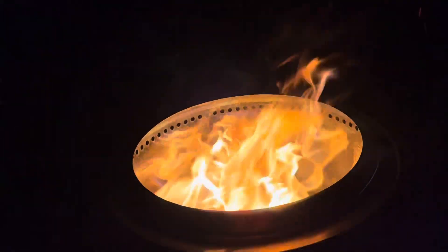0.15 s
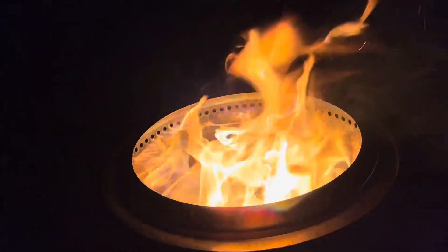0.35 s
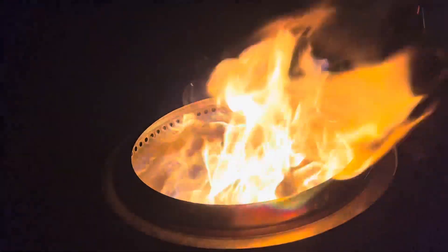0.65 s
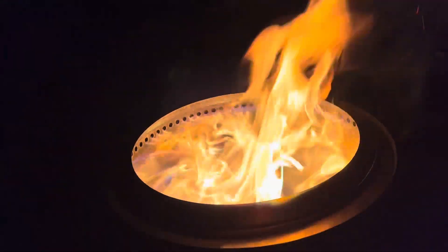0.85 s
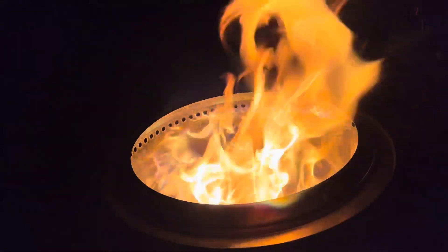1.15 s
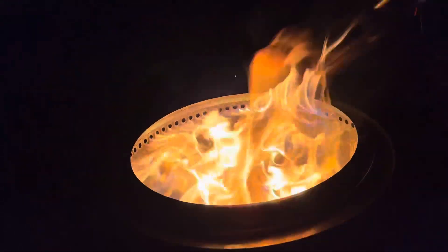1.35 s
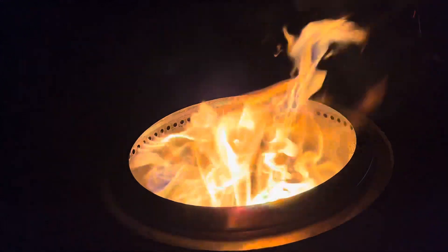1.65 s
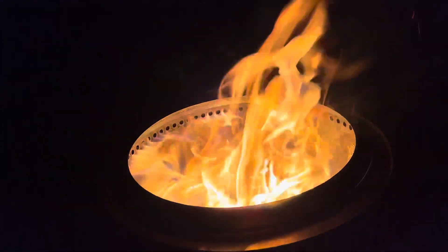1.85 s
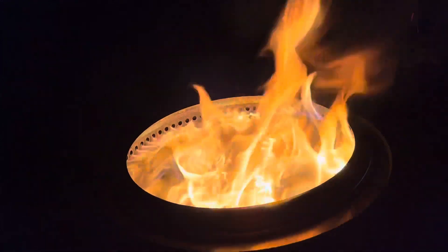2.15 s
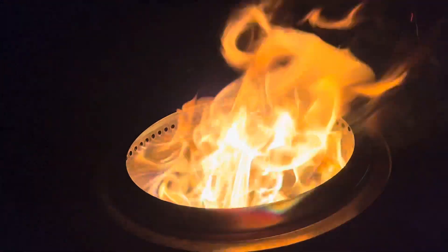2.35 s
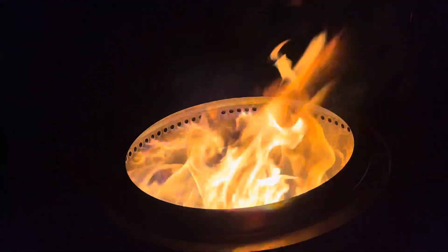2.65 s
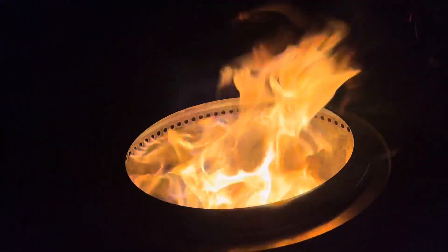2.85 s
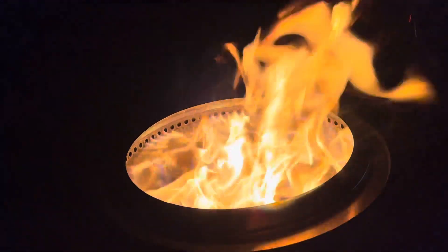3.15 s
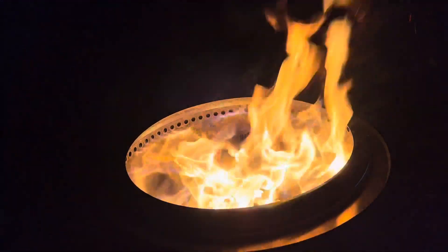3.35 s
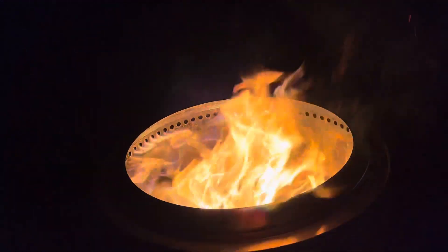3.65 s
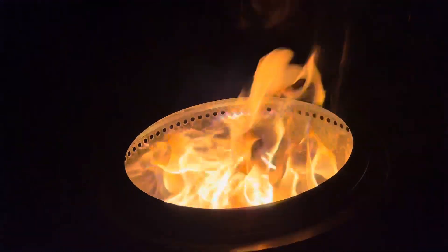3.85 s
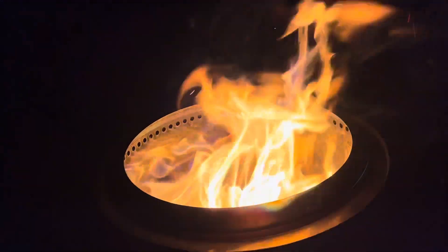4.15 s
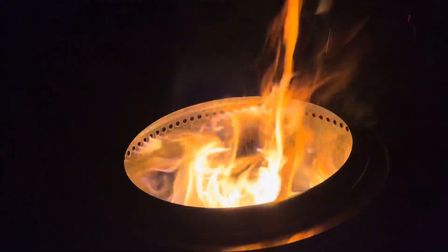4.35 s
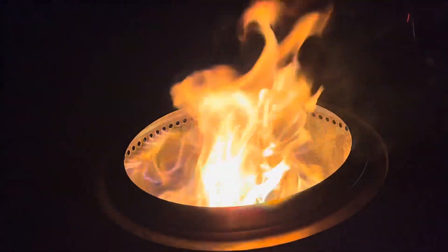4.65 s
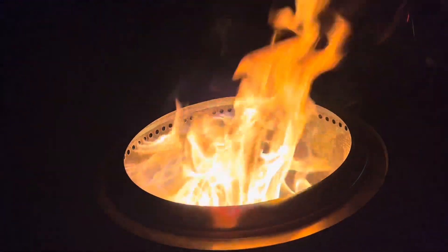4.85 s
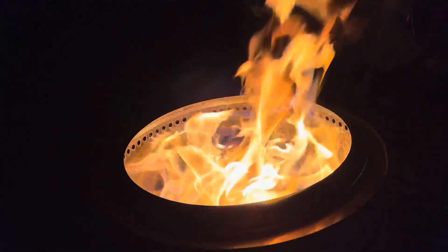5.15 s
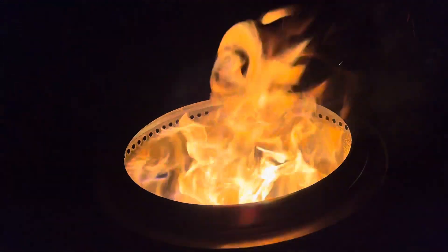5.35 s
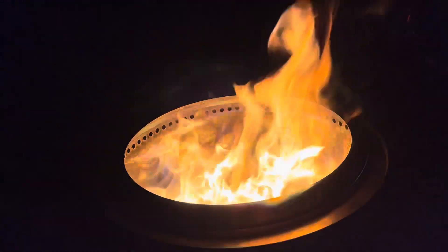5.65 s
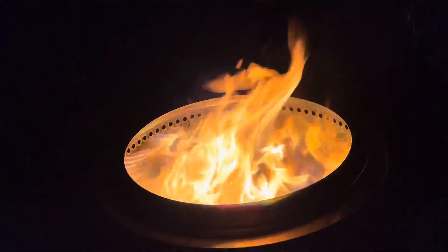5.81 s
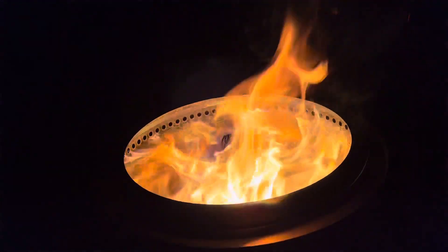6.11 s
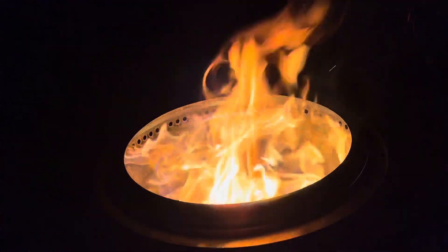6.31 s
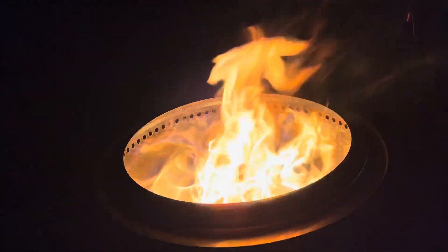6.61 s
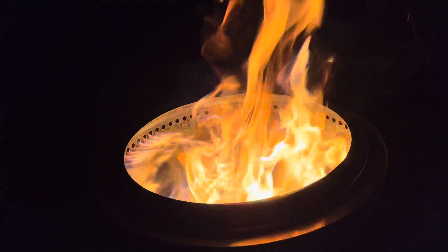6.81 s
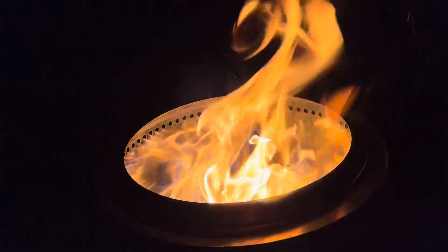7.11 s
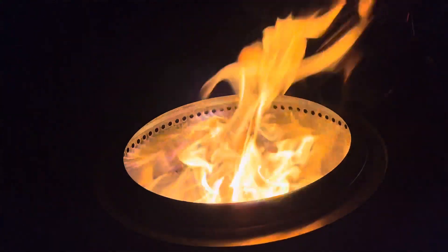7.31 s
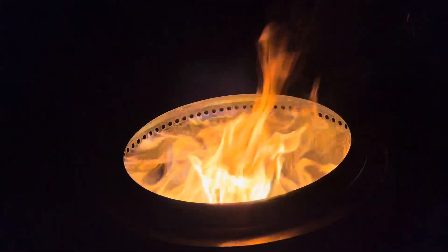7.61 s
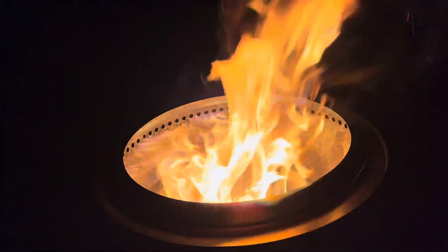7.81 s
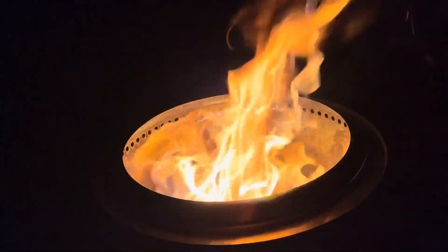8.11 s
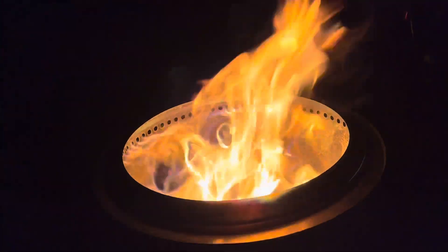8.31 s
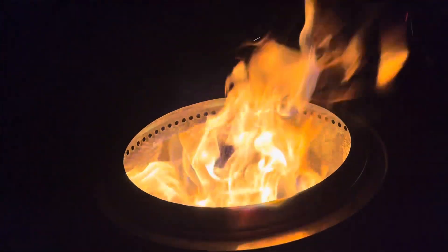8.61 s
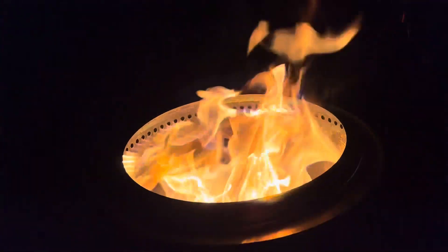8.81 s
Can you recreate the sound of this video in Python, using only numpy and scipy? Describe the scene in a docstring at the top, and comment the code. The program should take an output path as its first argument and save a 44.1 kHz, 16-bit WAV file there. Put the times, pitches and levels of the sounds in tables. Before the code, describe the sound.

A wood fire burns in a metal pit outdoors at night, heard close in stereo for about nine seconds. Its deep, soft roar flutters constantly, dipping briefly near 2.7 s and flaring around 5.8 s. A continuous cricket trill, rapid and purring, sits slightly right with a slightly lower, faster neighbour, inside a dense, shimmering chorus that swells gently about once a second. A higher cricket joins briefly near 0.8, 3.5, 5.9 and 8.5 s. Dull far bangs come from the left at 0.55, 0.9 and 1.35 s, the last trailing scattered echoes until 1.9 s; much fainter ones follow near 4.2, 5.8 and 8.3 s. Sharp dry snaps stand out at 0.55, 2.5, 4.8 and 5.8 s, thickening from 5.6 to 7.5 s among faint ticks. Soft gas thumps come at 0.6, 5.8 and 8 s. Thin steam sizzle strengthens after 7 s, strongest near 8.6 s.

```python
"""A wood fire flutters and rumbles on a summer night while its logs tick, snap and sizzle: shaped noise
under a moving level, with short clicks on top. A tree cricket trills close by, beside a slightly faster
neighbour, as pulsed tones; a dense chorus of other insects is made of more trills and shimmering noise bands.
A few dull bangs, like far-off fireworks, arrive from the left as filtered clicks with scattered returns."""
import sys
import numpy as np
from scipy import signal
from scipy.fft import rfft, irfft, next_fast_len
from scipy.io import wavfile

SR = 44100
rng = np.random.default_rng(int(sys.argv[2]) if len(sys.argv) > 2 else 0)


def wav_out(sig):
    """Save sig, one row per channel (or a flat mono array), as 16-bit PCM at SR to the path in sys.argv[1]."""
    wavfile.write(sys.argv[1], SR, np.round(np.clip(np.atleast_2d(sig).T, -1, 1) * 32767).astype(np.int16))


N = 395577
TIME, BINS = np.arange(N) / SR, np.fft.rfftfreq(N, 1 / SR)  # seconds, Hz


def amp(db):
    """Decibels to gain."""
    return 10 ** (np.asarray(db) / 20)


def unit(x):
    """Scales to rms 1."""
    return x / np.sqrt(np.mean(abs(x) ** 2) + 1e-20)


def colour(points):
    """Gain at every frequency from (Hz, dB) points, joined on a logarithmic frequency axis."""
    hz, db = np.transpose(points)
    return amp(np.interp(np.log(BINS + 1), np.log(hz), db))


def shaped(x, gain):
    """Filters by a gain given at every frequency."""
    size = next_fast_len(N, True)
    hz = np.fft.rfftfreq(size, 1 / SR)
    spectrum = rfft(x, size) * np.interp(hz, BINS, gain)
    return irfft(spectrum, size)[..., :N]


def wander(rate):
    """Smooth random curve of rms 1 that takes a new direction rate times a second."""
    knots = rng.standard_normal(4000)
    return unit(np.interp(TIME * rate, np.arange(len(knots)), knots))


def sides(balance_db):
    """Left and right gains that differ by balance_db; positive leans left."""
    return amp([[balance_db / 2], [-balance_db / 2]])


def ports(x, balance_db, turn=0):
    """Places an analytic sound on two microphones, the right one turned in phase (radians)."""
    left = x * amp(balance_db / 2)
    right = x * np.exp(1j * turn) * amp(-balance_db / 2)
    return np.array([left, right]).real


def add(mix, s, sound):
    """Adds a sound at time s in seconds."""
    part = mix[..., max(round(s * SR), 0):][..., :sound.shape[-1]]
    part += sound[..., :part.shape[-1]]


def scatter(x, t60):
    """Diffuse echoes from ground, trees and fences, different on each side, fading 60 dB in t60 seconds."""
    t = TIME[:SR // 2]
    tail = rng.standard_normal((2, len(t))) * amp(-60 * t / t60)
    tail /= np.linalg.norm(tail, axis=1, keepdims=True)
    return signal.oaconvolve(np.atleast_2d(x), tail, axes=1)[:, :N]


def causal(points):
    """The ring of one click through a spectrum: quick rise, then decay, with peak 1 (minimum phase)."""
    hz = np.fft.rfftfreq(4096, 1 / SR)
    log_gain = np.log(np.interp(hz, BINS, colour(points)))
    log_gain = np.concatenate([log_gain, log_gain[-2:0:-1]])
    ring = np.fft.ifft(np.exp(signal.hilbert(log_gain).conj())).real[:2048]
    return ring / abs(ring).max()


def cloud(t60):
    """A dying cloud of tiny clicks with energy 1, fading 60 dB in t60 seconds."""
    t = TIME[:SR // 4]
    clicks = rng.standard_normal(len(t)) * amp(-60 * t / t60)
    return clicks / np.linalg.norm(clicks)


def shimmer_band(hz, spread_hz, shimmer_db=1.22, shared=0.19):
    """Noise in a bell-shaped band with a quick random shimmer, rms 1, partly alike on both sides."""
    noise = rng.standard_normal((2, N))
    bell = np.exp(-((BINS - hz) / spread_hz / 2) ** 2)
    band = shaped(noise + shared * noise[::-1] / 2, bell)
    return unit(band * amp(shimmer_db * wander(70)))


def trill(hz, fall_hz, rate, width, first=0, slip=.00005, uneven_db=2.5):
    """Each wing stroke draws the scraper over the file: a soft tone pulse whose pitch sags."""
    chance = rng.standard_normal((700, 3))  # one row a stroke: timing, pitch, loudness
    centres = first + (np.arange(len(chance)) - 1) / rate + slip * np.cumsum(chance[:, 0])
    stroke = np.searchsorted((centres[1:] + centres[:-1]) / 2, TIME)  # the nearest stroke at each moment
    t = TIME - centres[stroke]
    swell = np.exp(-.5 * (t * rate / width) ** 2) * np.cos(np.pi * t * rate).clip(0) ** .5
    turns = (hz + 10 * chance[stroke, 1]) * t - fall_hz * rate * t ** 2 / 2
    loudness = amp(uneven_db * chance[stroke, 2])
    return unit(swell * loudness * np.exp(2j * np.pi * turns))


def air():
    """The faint hiss of the night and the microphones: coloured noise, wavering a little."""
    # Spectrum of the hiss. Each row: frequency in Hz, level in dB per Hz before the waver.
    hiss_spectrum = [(300, -108), (780, -117), (1020, -112), (1260, -117), (1620, -104), (3500, -103),
                     (4560, -110), (6000, -107), (7600, -114), (9300, -134), (15200, -134)]
    hiss = shaped(rng.standard_normal((2, N)), colour(hiss_spectrum)) * np.sqrt(SR / 2)
    return hiss * amp(.5 * wander(12))


def chorus(swell_db=1.0, uneven_db=0.8):
    """Countless far trills merge into bands: one sings in regular waves, the others swell at random."""
    # Far swarms, too many to tell apart.
    # Each row: centre in Hz, spread in Hz, mean level in dB, left-right balance in dB.
    swarms = [(1895, 38, -72, 2), (2302, 89, -57, -8.5), (2799, 117, -59.5, -1), (3420, 170, -63.5, -1.5),
              (4970, 100, -80.5, 4), (5266, 216, -71, 14), (6586, 314, -70.5, 3.5)]
    wave_db, wave_depth_db = -55.5, 1.34  # mean level, swing either way
    crest_s, period_s = .25, .873
    waves_db = wave_depth_db * np.cos(2 * np.pi * (TIME - crest_s) / period_s)
    waves_db += uneven_db * wander(4)
    out = shimmer_band(4026, 122.4) * amp(wave_db + waves_db) * sides(1.4)
    for hz, spread_hz, db, balance_db in swarms:
        level = amp(db + swell_db * wander(7.9))
        out += shimmer_band(hz, spread_hz) * level * sides(balance_db)
    return out


def crickets(burst_hz=4400, fade_s=.065):
    """Farther wing-stroke trills, steady or chirping, blurred by echoes; one more joins in short bursts."""
    # Single crickets. Each row: pitch in Hz, fall over one stroke period in Hz, strokes per second,
    # chirps per second, sounding share of a chirp cycle, level in dB, left-right balance in dB.
    singers = [(2824, 160, 41, .2, 0.96, -71.5, 4), (4200, 24, 95, 4.2, 0.22, -70, -2),
               (4820, 70, 47, 1.9, 0.76, -76.5, 0), (5240, 100, 52, 4.9, 0.84, -69.5, 4),
               (5530, 48, 96, 4.1, 0.37, -77, 0)]
    # Bursts of one cricket pitched above the near pair. Each row: start in seconds, end in seconds, level in dB.
    bursts = [(.83, 1.21, -64), (3.5, 3.88, -57), (5.9, 6.28, -57.5), (8.46, 8.7, -64)]
    out = np.zeros((2, N))
    for hz, fall_hz, rate, chirps, share, db, balance_db in singers:
        cycle = (chirps * TIME + rng.random() + 0.28 * wander(1.945)) % 1
        gate = np.sin(np.pi * np.minimum(cycle / share, 1)).clip(0) ** .5
        song = trill(hz, fall_hz, rate, width=0.51, slip=.0003).real * gate
        out += amp(db) * unit(scatter(song, t60=0.16)) * sides(balance_db)
    gate = np.zeros(N)
    for start, end, db in bursts:
        gate += amp(db) * np.clip(np.minimum(TIME - start, end - TIME) / fade_s, 0, 1)
    strokes = trill(burst_hz, 130, 38.6, first=.019, width=.2, slip=.00015, uneven_db=.7)
    song = ports(gate * strokes, balance_db=4, turn=1.1)
    return out + song + amp(-8) * scatter(song, t60=.12)


def bangs(scatter_gain_db=-2, bounce_s=0.00335, bounce_db=-11, echo_db=-20):
    """Far reports, dulled by the air: filtered clicks, with returns from the land smeared into clouds."""
    # Bangs and their returns from the land around. Each row: time in seconds,
    # report level in dB, scattered sound relative to the report in dB before scatter_gain_db.
    reports = [(0.557, -30, 0), (0.903, -37, -7), (1.337, -29.5, -5), (1.394, -50, 12.5), (1.442, -48, 6.5),
               (1.513, -56, 9), (1.575, -62, 16), (1.693, -53, 6), (1.748, -55, 15), (1.791, -59, 17.5),
               (1.82, -62.5, 17), (1.862, -59, 7), (2.249, -60, -4), (4.156, -48, -2), (5.822, -49, 9),
               (8.334, -50.5, -7)]
    # Spectrum of a report. Each row: frequency in Hz, relative level in dB.
    report_spectrum = [(100, -55), (300, -10.5), (420, -8.5), (560, 0.5), (760, -3.5), (930, -13),
                       (1040, -7.5), (1170, -16.5), (1290, -33), (1450, -23.5), (1680, -14), (1900, -32),
                       (2300, -18), (5000, -100)]
    # Spectrum of the scattered sound. Each row: frequency in Hz, relative level in dB.
    scatter_spectrum = [(100, -42.5), (300, -11), (420, -12.5), (560, -1), (780, -7.5), (930, -2.5),
                        (1040, -4), (1170, -9), (1290, -16.5), (1450, -7), (1680, -0.5), (1900, -9.5),
                        (2300, -11), (5000, -84.5)]
    direct, scattered = np.zeros((2, N))
    report = causal(report_spectrum)
    for s, db, scatter_db in reports:
        add(direct, s + 0.00092, amp(db) * report)
        add(direct, s + 0.0011 + bounce_s, amp(db + bounce_db) * report)  # one quick reflection close by
        add(scattered, s + 0.00088, amp(db + scatter_db + scatter_gain_db) * cloud(t60=0.093))
    sound = direct + signal.oaconvolve(scattered, causal(scatter_spectrum))[:N]
    placed = ports(signal.hilbert(sound), balance_db=8, turn=2)
    return placed + amp(echo_db) * scatter(placed, t60=0.19)


def tree_crickets(width=0.22, effort_db=.5):
    """The nearest wings trill a little to the right; a lower, faster neighbour drifts in and out of step."""
    near_db, near_hz, near_fall_hz, near_rate = -50.0, 2372, 250, 34.48  # rate in wing strokes a second
    neighbour_db, neighbour_hz, neighbour_fall_hz, neighbour_rate = -53.5, 2315, 170, 36.01
    strokes = trill(near_hz, near_fall_hz, near_rate, width, first=.0055, slip=.00004, uneven_db=1.2)
    song = ports(strokes, balance_db=-4, turn=-.7)
    song += amp(-14) * unit(scatter(song, t60=0.53))
    strokes = trill(neighbour_hz, neighbour_fall_hz, neighbour_rate, width, first=.0035, slip=.00004)
    neighbour = ports(strokes, balance_db=-3, turn=-.5)
    neighbour += amp(-8) * scatter(neighbour, t60=0.18)
    return amp(near_db + effort_db * wander(3.6)) * song + amp(neighbour_db) * neighbour


def from_fire(x, balance_db=0, lag_s=.000326):
    """Places a sound of the fire on two microphones: the left one hears it a little later."""
    hz = np.fft.rfftfreq(len(x), 1 / SR)
    late = irfft(rfft(x) * np.exp(-2j * np.pi * hz * lag_s), len(x))
    return np.array([late * amp(balance_db / 2), x * amp(-balance_db / 2)])


def embers(waver_db=0.6, waver_per_s=14):
    """The glowing wood gives a thin, wavering hiss of coloured noise."""
    # Spectrum of the hiss. Each row: frequency in Hz, level in dB per Hz before the waver.
    ember_spectrum = [(5000, -135), (8300, -122), (9300, -134), (10700, -129), (12200, -117), (13800, -123),
                      (15200, -116)]
    hiss = shaped(rng.standard_normal(N), colour(ember_spectrum)) * np.sqrt(SR / 2)
    return from_fire(hiss * amp(waver_db * wander(waver_per_s)))


def sizzle(lift_db=2, hz=8150, spread_hz=350, sputter_db=3.5, sputter_per_s=14):
    """Sap sizzles out of the logs: a thin jet of steam, a noise band that sputters as it comes and goes."""
    # Strength of the steam. Each row: time in seconds, level in dB before lift_db and the sputter.
    steam = [(0, -87), (1.8, -88.5), (3.2, -87), (4.3, -91.5), (5.7, -84), (6.3, -86), (7.3, -80),
             (8.45, -86), (8.58, -75.5), (8.97, -81)]
    steam_db = np.interp(TIME, *np.transpose(steam)) + lift_db
    return shimmer_band(hz, spread_hz) * amp(steam_db + sputter_db * wander(sputter_per_s))


def puffs(cycles=3.3):
    """Pockets of gas catch light, each with a soft thump: a few cycles of tone under a half-sine swell."""
    # Pockets of gas. Each row: start in seconds, peak level in dB, pitch in Hz.
    pockets = [(0.57, -45, 122), (3.13, -61, 342), (5.195, -51.5, 254), (5.279, -61.5, 306),
               (5.646, -53, 268), (5.828, -38, 247), (6.375, -61, 373), (6.961, -50, 239),
               (7.973, -42, 119)]
    out = np.zeros(N)
    for s, db, hz in pockets:
        length = cycles / hz
        t = np.arange(0, length, 1 / SR)
        swell = np.sin(np.pi * t / length)
        add(out, s, amp(db) * swell * np.cos(2 * np.pi * hz * (t - length / 2)))
    return out


def flames(flap_db=1.8, flap_per_s=28, flutter_db=3.0, side_db=-15, tongue_db=4.5):
    """Turbulent burning: a deep noise roar, with quick tongues of flame that grow as the fire flares."""
    # Flame strength. Each row: time in seconds, rumble level in dB before the random flapping.
    strength = [(0.0, -57.0), (0.5, -58.5), (0.56, -54.5), (1.35, -56.5), (1.92, -63.0), (2.05, -54.5),
                (2.2, -61.5), (2.42, -55), (2.62, -55.5), (2.71, -71.5), (2.84, -56.5), (3.38, -62),
                (3.6, -56), (4.4, -58), (5.3, -57), (5.8, -53), (5.9, -60), (6.05, -56), (6.2, -57.5),
                (8.0, -57), (8.4, -55), (8.53, -62), (8.63, -53), (8.97, -58.5)]
    # Spectrum of the roar. Each row: frequency in Hz, relative level in dB.
    roar_spectrum = [(18, -36), (30, -17), (42, -4.5), (65, 2), (100, 0), (150, -6.5), (240, -8),
                     (310, -23.5), (420, -33.5), (700, -40.5), (1300, -49), (3000, -110)]
    strength_db = np.interp(TIME, *np.transpose(strength)) + flap_db * wander(flap_per_s)
    middle, side = unit(shaped(rng.standard_normal((2, N)), colour(roar_spectrum)))
    roar = middle + amp(side_db) * np.array([side, -side])
    deep = shaped(roar, 1 / (1 + (BINS / 130) ** 4))
    flare = np.tanh(unit(strength_db - strength_db.mean()))
    # Above the deep part, the roar flutters and follows the flares more strongly.
    tongues = (roar - deep) * unit(amp(flutter_db * wander(55) + tongue_db * flare))
    return (deep + tongues) * amp(strength_db) * sides(1)


def faint_snaps(per_s=10, weakest_db=-64, range_db=12, woody_db=-18, spread_db=6):
    """Small snaps of the wood at random times, the weakest most often; rows like those of the louder snaps."""
    rows = []
    for when, size, dry_share, side in rng.random((int(per_s * N / SR), 4)):
        level_db = weakest_db + range_db * size ** 2
        rows.append((when * N / SR, level_db, woody_db * dry_share, spread_db * (side - .5)))
    return rows


def snaps(lift_db=4.5, ring_db=-9, ring_hz=8100, first_db=-11, lead_s=.002, splinter_db=-1, echo_db=-12):
    """Wood fibres burst in sharp, splintery ticks, some with a short ring; faint ones fall in between."""
    # Snaps of the logs. Each row: time in seconds, level in dB before lift_db,
    # woody ring relative to the snap in dB before ring_db, left-right balance in dB.
    loud_snaps = [(0.2233, -50, -28, 1), (0.5502, -40, -25, -3), (0.677, -57, -7, -12),
                  (1.5129, -45, -30, -2), (1.619, -46, 6, -4.5), (1.6845, -52, -12, 0),
                  (2.3689, -53, -2, -3), (2.5322, -35.5, -13, -2), (2.8676, -51.5, 6, -8),
                  (2.9566, -53, -7, 0), (3.369, -49, 5, 0), (3.3906, -48, -19, 0), (3.8012, -49, -27, 0.5),
                  (3.8969, -49, -18, 2), (4.2726, -47, -18, 0), (4.6994, -46, -7, -2),
                  (4.791, -39.5, 1, -1), (4.8474, -51, 0, -2), (5.3521, -48, -23, 0.5),
                  (5.4983, -55, 8, -6), (5.609, -44.5, -20, -0.5), (5.773, -34.5, -24, 1),
                  (5.8231, -44, -9, -1), (6.0949, -55, 2, -3.5), (6.3568, -49, 0, 0.5), (6.6, -48, 10, 4),
                  (6.6651, -49, -7, 3), (6.7685, -43, -22, 2), (6.8772, -41.5, -6, -3),
                  (7.0967, -51, -11, 0), (7.1341, -51, -17, -1.5), (7.454, -41.5, -10, 0),
                  (7.516, -48, 3, -5), (7.838, -51, -4, 1.5), (8.0837, -50, -20, -2),
                  (8.4117, -51.5, -20, -6)]
    # Spectrum of a tick. Each row: frequency in Hz, relative level in dB.
    tick_spectrum = [(1200, -34), (2500, -15.5), (5000, -1), (8000, -7), (10000, -9.5), (12300, 1.5),
                     (13800, -1), (16000, -2.5)]
    out, tick = np.zeros((2, N)), causal(tick_spectrum)
    t = TIME[:len(tick)]
    for s, db, woody_db, balance_db in list(loud_snaps) + faint_snaps():
        splinters = signal.fftconvolve(cloud(t60=0.008), tick)[:len(t)]
        crack = tick + amp(splinter_db) * splinters
        tone = np.sin(2 * np.pi * ring_hz * rng.uniform(.93, 0.996) * t)
        ring = tone * amp(woody_db + ring_db - 60 * t / 0.014)  # fades 60 dB in 14 ms
        snap = amp(db + lift_db) * from_fire(crack + ring, balance_db)
        add(out, s + 0.0016, snap)
        add(out, s - rng.uniform(0, lead_s), amp(first_db) * snap)  # a thinner fibre gives way first
    return out + amp(echo_db) * scatter(out, t60=.06)


def scene():
    """Fire in front, insects all round, bangs far away."""
    insects = chorus() + crickets() + tree_crickets()
    fire = embers() + sizzle() + puffs() + flames() + snaps()
    return air() + insects + bangs() + fire


def record(dry):
    """The recorder's band limit: a steep low-pass."""
    low_pass = signal.firwin(511, 15900, window=("kaiser", 9), fs=SR)  # edge in Hz
    return signal.oaconvolve(dry, low_pass[None], "same")


dry = scene()
out = record(dry)
wav_out(out)
```